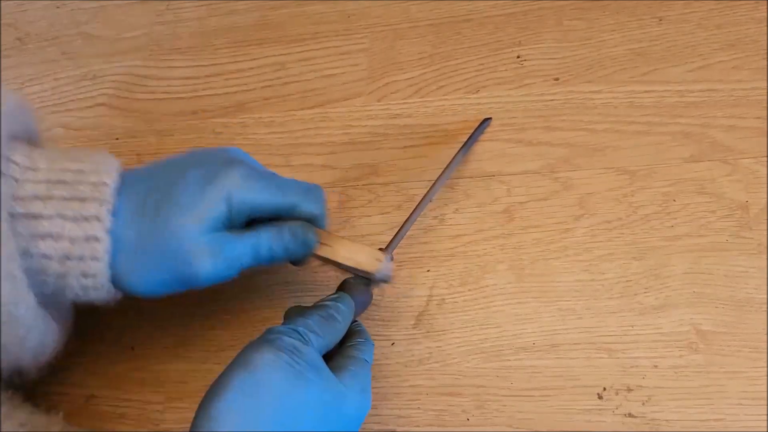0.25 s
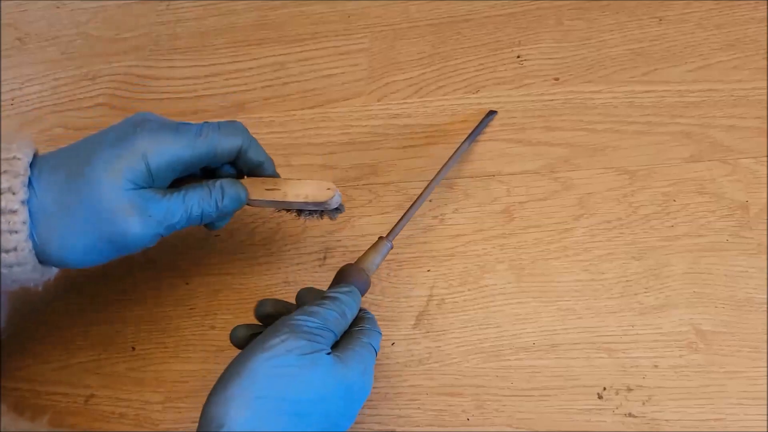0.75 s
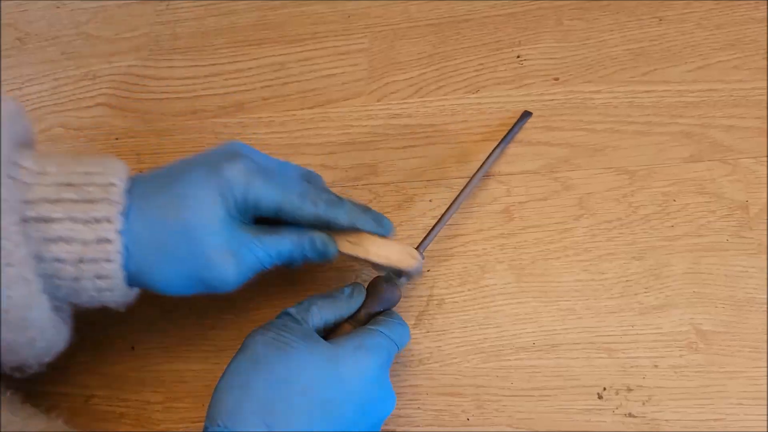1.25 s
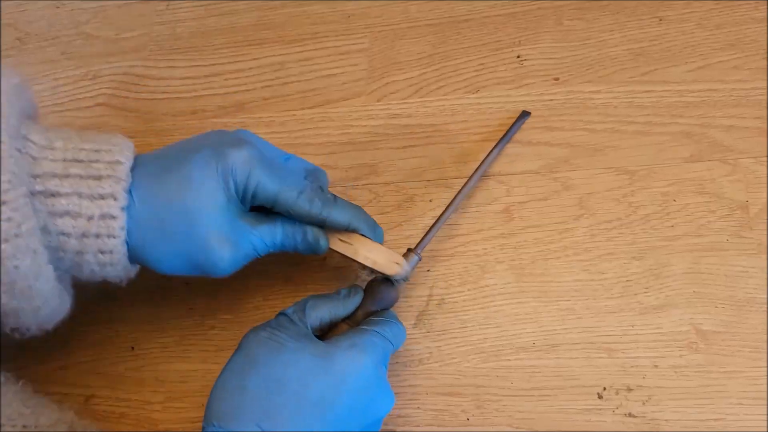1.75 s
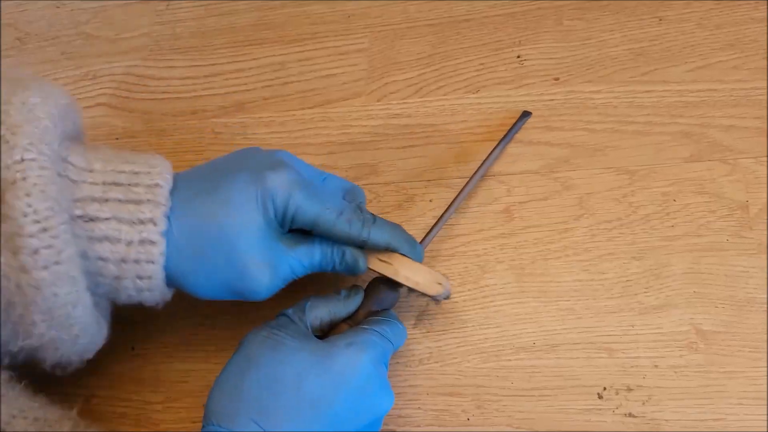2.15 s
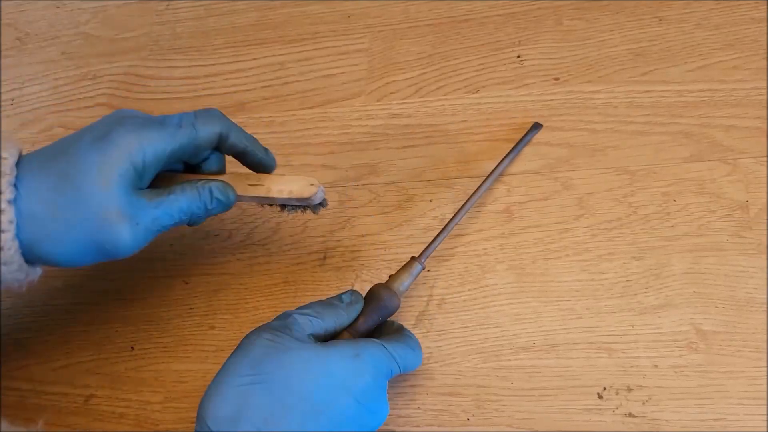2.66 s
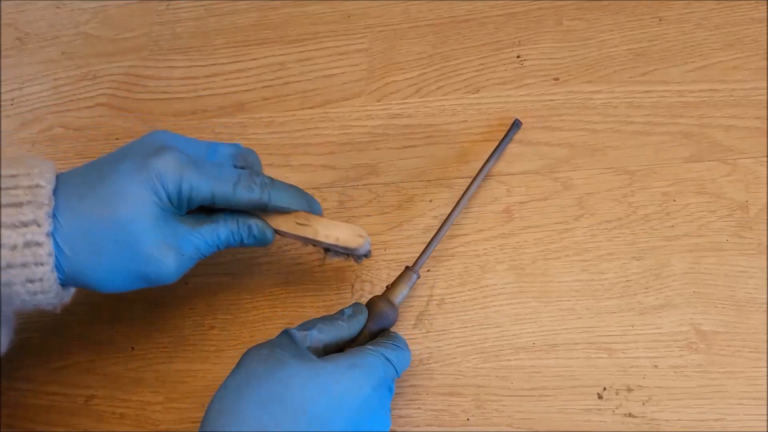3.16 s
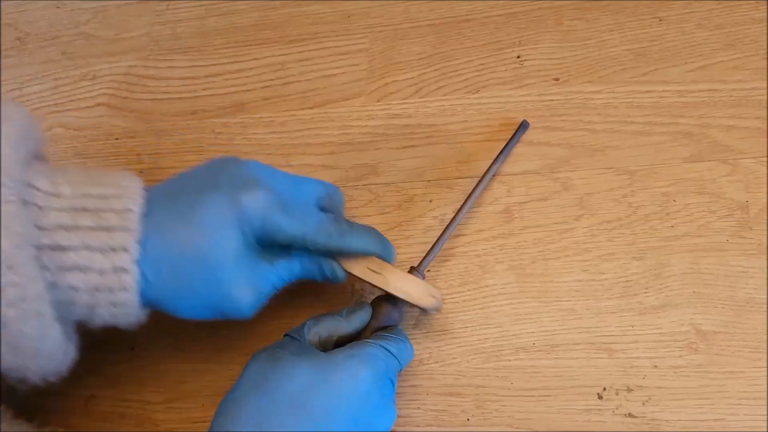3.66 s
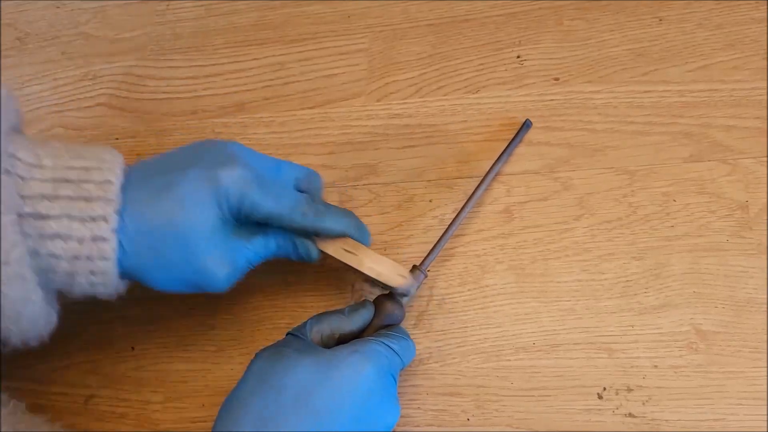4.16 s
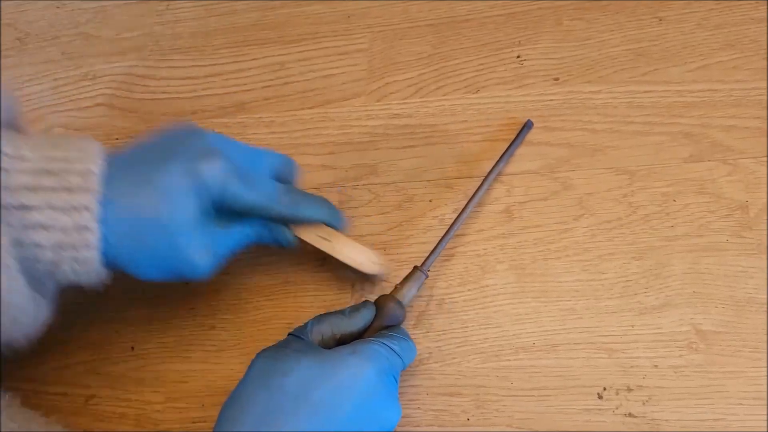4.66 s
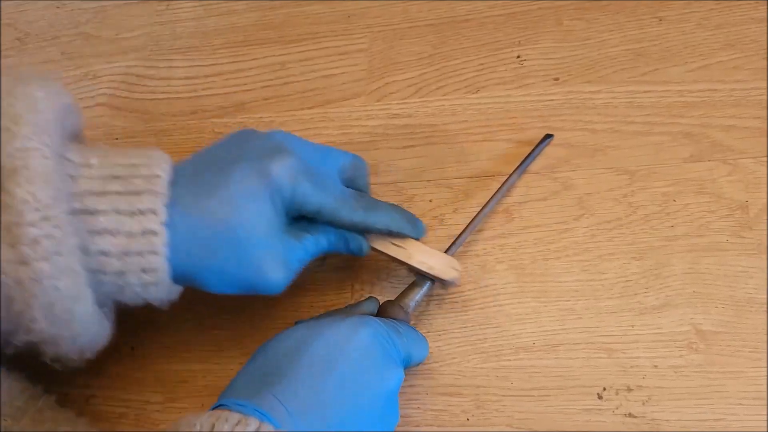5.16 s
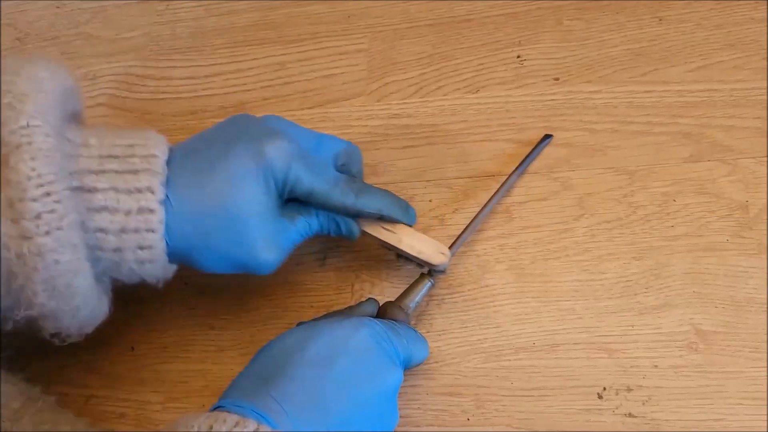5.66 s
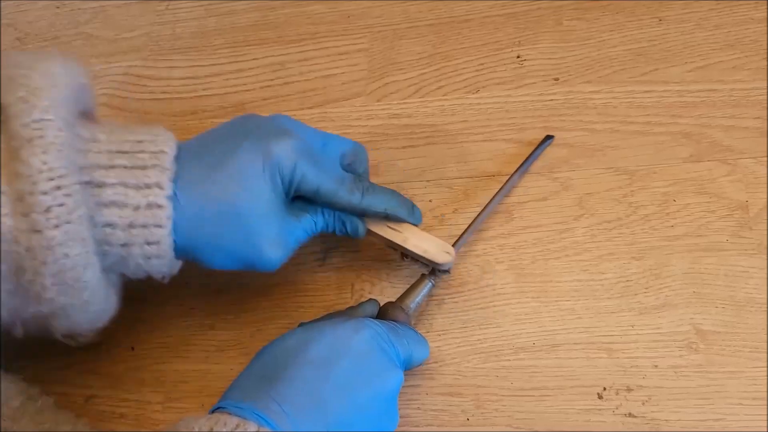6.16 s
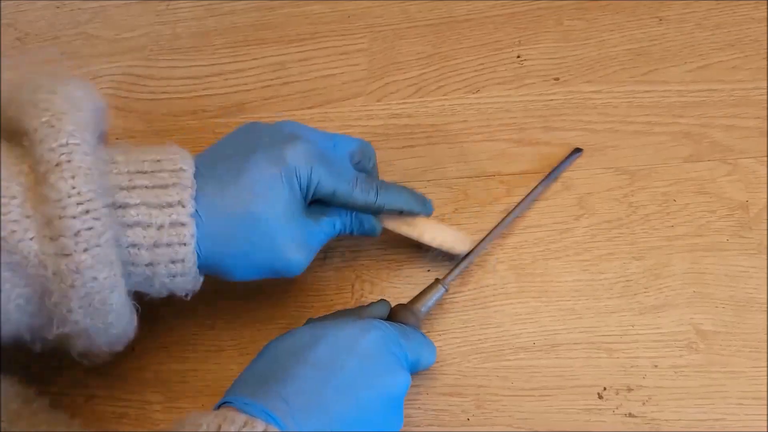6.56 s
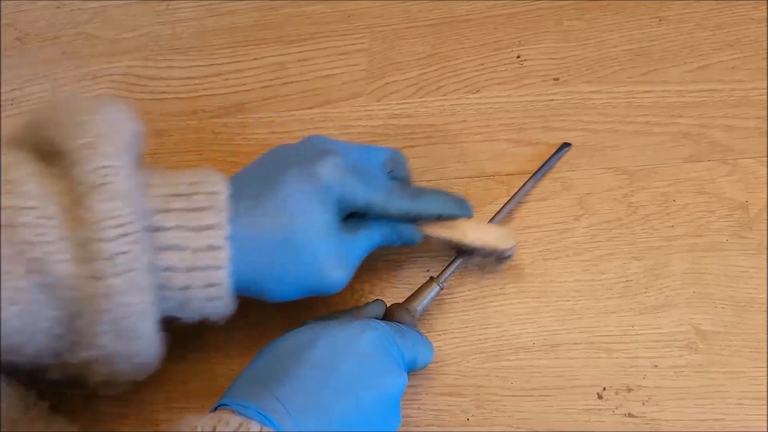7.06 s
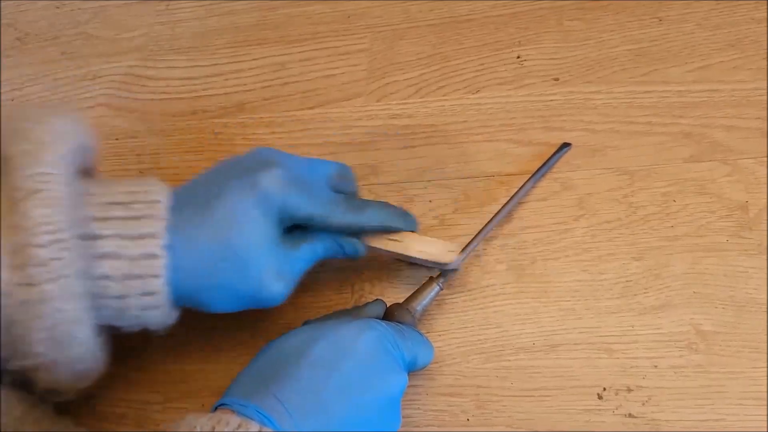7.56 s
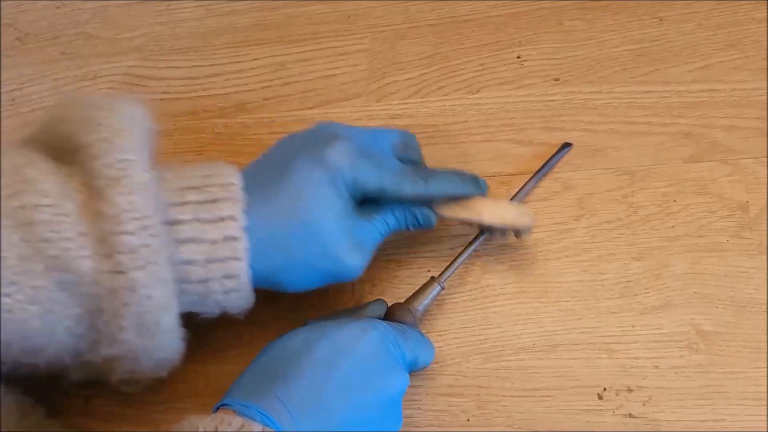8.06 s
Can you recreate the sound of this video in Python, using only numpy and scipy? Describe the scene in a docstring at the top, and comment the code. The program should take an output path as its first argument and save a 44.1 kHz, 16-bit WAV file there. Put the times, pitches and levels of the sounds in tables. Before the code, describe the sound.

A small wire brush scrubs a rusty steel shaft in quick, hissing back-and-forth strokes on a wooden table, with brief pauses and one knock.

```python
"""A small wire brush scrubs a rusty steel shaft held down on a wooden table, close to the microphone.
Each stroke hisses in the bristles, rasps in the shaft and makes the table thrum. Near 0.5 s and again
near 2.5 s the brush lifts and the tool is turned, scraping on the wood as rubber gloves rustle faintly.
Brushing resumes, and the steel rings more as the wires reach the bare shaft. At 6.6 s the tool knocks
once on the table, and the last slow strokes land with soft thuds."""
import sys
import numpy as np
from scipy import signal
from scipy.fft import rfft, irfft, next_fast_len
from scipy.io import wavfile
from scipy.ndimage import uniform_filter1d, map_coordinates

SR = 44100
rng = np.random.default_rng(int(sys.argv[2]) if len(sys.argv) > 2 else 0)


def wrap_up_sound(samples):
    """Save the sound to the file named by the first command line argument, as 16-bit audio."""
    columns = np.atleast_2d(samples).T
    # keep every value between -1 and 1, then stretch to whole-number steps
    tamed = np.clip(columns, -1, 1)
    steps = np.round(tamed * 32767).astype(np.int16)
    wavfile.write(sys.argv[1], SR, steps)


N = 366471
TIME = np.arange(N) / SR

# brush strokes: (bite time [s], length [s], pressure as hiss level [dB], catch on the rust [dB])
STROKES = [(-0.059, 0.073, -54.5, -4.5), (0.094, 0.07, -53, -4.5), (0.238, 0.076, -54, -4),
           (0.378, 0.058, -51.5, -3.5), (1.366, 0.044, -62, -8.5), (1.479, 0.072, -57.0, -6.5),
           (1.633, 0.078, -55.5, -1), (1.78, 0.075, -55.5, 5.5), (1.909, 0.069, -55.5, -2),
           (2.05, 0.074, -51, 0), (2.193, 0.06, -56, 0), (2.324, 0.086, -48.5, -2.5),
           (3.493, 0.059, -64.5, 1), (3.603, 0.058, -57.5, -3.5), (3.74, 0.068, -58, -2.5),
           (3.885, 0.066, -56.5, -3.5), (4.013, 0.075, -55, -3.0), (4.171, 0.058, -55, -2.5),
           (4.301, 0.063, -53.0, 0), (4.443, 0.06, -52.5, -1.5), (4.571, 0.06, -50.5, -2.5),
           (4.709, 0.059, -49, -3.5), (4.921, 0.057, -47, 2), (5.068, 0.061, -61, -7.5),
           (5.202, 0.059, -54, -5), (5.325, 0.066, -58.5, -5), (5.447, 0.069, -56.0, -4),
           (5.604, 0.052, -54.5, -0.5), (5.709, 0.067, -53, -0.5), (5.848, 0.054, -54.5, -3.5),
           (5.958, 0.087, -56, -1), (6.114, 0.063, -56.0, -2), (6.248, 0.063, -52, -2),
           (6.376, 0.073, -58.0, 0), (6.524, 0.08, -57, -4.5), (7.002, 0.081, -58, -2.5),
           (7.145, 0.086, -56.5, 2.5), (7.29, 0.099, -54.0, 1.0), (7.619, 0.097, -52.0, 3),
           (7.947, 0.081, -51, 2), (8.277, 0.039, -49.5, 2.5)]
# spectrum of the wire bristles: (frequency [Hz], relative level [dB])
BRISTLES = [(1200, -27), (2500, -22), (3800, -11.5), (4900, 1.5), (6000, -1.5), (7200, 0.5), (8700, -3.5),
            (10200, -3), (12000, 1.5), (14400, 2.5), (16000, 1)]
# resonances of grit, handle and table: (frequency [Hz], bandwidth [Hz], relative level [dB])
GRIT_MODES = [(3000, 550, -1), (3370, 80, -1), (3760, 400, -6.5), (4190, 100, -0.5), (4560, 360, -22),
              (4680, 160, -4.5), (4970, 1300, -9), (6620, 440, -12), (7660, 1000, -16.5),
              (11900, 9200, -25.5)]
HANDLE_MODES = [(651, 48, -3), (752, 120, -10.5), (852, 87, -1), (923.4, 105, -1), (1051, 95, -0.5),
                (1148, 35, -5.5), (1184, 270, -14.5)]
TABLE_MODES = [(58, 28, -18.5), (139, 26.3, -5), (232.2, 17.6, 2), (268.5, 34.7, 1.5), (322, 84, -7),
               (353.4, 31, -10), (421, 87, -17.5), (507, 74, -23)]


def amp(db):
    """Amplitude ratio: tenfold for every 20 dB."""
    return 10 ** (np.asarray(db) / 20)


def unit_rms(x):
    """Normalisation to unit mean power."""
    return x / np.sqrt(np.mean(x ** 2) + 1e-20)


def read(points, hz):
    """Interpolation on a logarithmic frequency axis."""
    f, value = np.transpose(points)
    return np.interp(np.log(hz + 1), np.log(f + 1), value)


def step(t, edge):
    """Smooth transition from 0 to 1 around t = 0."""
    return .5 + .5 * np.tanh(t / (2 * edge))


def add(mix, s, sound):
    """Superposition: a sound joins the mix at s seconds."""
    part = mix[round(s * SR):][:len(sound)]
    part += sound[:len(part)]


def colour(x, table, size=8192):
    """Minimum-phase filter of unit energy, from a spectrum (two columns) or resonances (three)."""
    hz = abs(np.fft.fftfreq(size, 1 / SR))
    if len(table[0]) == 2:
        gain = amp(read(table, hz))
    else:
        gain = np.sqrt(sum((amp(db) / (1 + (2 * (hz - f) / width) ** 2)) ** 2 for f, width, db in table))
    log_gain = np.log(np.maximum(gain, 1e-5))
    response = np.fft.ifft(np.exp(np.conj(signal.hilbert(log_gain)))).real[:size // 2]
    return signal.oaconvolve(x, response[None] / np.linalg.norm(response), axes=1)[:, :x.shape[1]]


def noise():
    """Partial coherence: white noise at two microphones, alike in the bass, unrelated in the treble."""
    # likeness of left and right: (frequency [Hz], correlation [0-1])
    likeness = [(60, .88), (150, .98), (320, .985), (650, .8), (1100, .7), (2000, .42), (3200, .15),
                (6000, 0), (15000, 0)]
    size = next_fast_len(N)
    left, unrelated = rfft(rng.standard_normal((2, size)))
    same = read(likeness, np.fft.rfftfreq(size, 1 / SR))
    right = same * left + np.sqrt(1 - same ** 2) * unrelated
    return irfft(np.array([left, right]), size)[:, :N]


def snags(per_s, spread_db, decay_s, smooth):
    """Shot noise: the force of many tiny random catches, over a share of smooth sliding."""
    sizes = amp(spread_db * np.minimum(rng.exponential(1, N), 4)) * (rng.random(N) < per_s / SR)
    power = signal.lfilter([1], [1, -np.exp(-1 / (decay_s * SR))], sizes ** 2)
    return np.sqrt(smooth + (1 - smooth) * power / power.mean())


def judder(per_s, depth_db):
    """Random modulation by an uneven grip: a factor that wanders at the given rate."""
    knots = np.arange(0, TIME[-1] + 1, 1 / per_s)
    return unit_rms(amp(depth_db * np.interp(TIME, knots, rng.standard_normal(len(knots)))))


def shimmer(x, patchy_db, bins, sheen_db=0., sheen_hz=10500):
    """Spectral modulation: shifting contacts vary the colour in patches; the finest tips set the sheen."""
    hz, t, spectrum = signal.stft(x, SR, nperseg=512)
    patches = uniform_filter1d(rng.standard_normal(spectrum.shape[1:]), size=bins, axis=0)
    patches = unit_rms(uniform_filter1d(patches, size=12, axis=1))
    top_db = step(hz - sheen_hz, 1200)[:, None] * np.interp(t, TIME, sheen_db * np.ones(N))
    return signal.istft(spectrum * amp(patchy_db * patches + top_db), SR, nperseg=512)[1][:, :N]


def stroke_force(level_db, growth_db, bite_s, release_s, lead_s, turn_db, turn_s, snap_db, snap_s=.007):
    """Friction envelope: wires snap in, sweep and let go, dragging lightly while the hand turns round."""
    power = np.zeros(N)
    for (bite, length, *_), db in zip(STROKES, level_db):
        near = slice(*np.searchsorted(TIME, [bite - .2, bite + length + .3]))
        t = TIME[near] + lead_s - bite
        growth = amp(growth_db * np.clip(t / length - .5, -.5, .5))
        sweep = growth * step(t, bite_s) * step(length - t, release_s)
        turning = amp(turn_db) * step(t + turn_s, 0.016) * step(length + turn_s - t, 0.036)
        snap = amp(snap_db) * step(t + bite_s, 0.00056) * np.exp(-np.maximum(t + bite_s, 0) / snap_s)
        power[near] += amp(db) ** 2 * ((sweep + turning) ** 2 + snap ** 2)
    return np.sqrt(power)


def brush(grit_slope=0.63):
    """Friction noise: pressure sets hiss and thrum; catching on rust adds rasp, grit and chatter."""
    # where the brush works, first by the handle, later on the bare shaft: (time [s], steel ring [dB],
    # share of open wire scratch [0-1], sheen [dB], coupling to handle [dB], coupling to table [dB])
    contact = [(0.2, -36, 0.27, 0.5, 0, 3.5), (1.5, -23, 0.7, -0.5, 0, 6), (2.3, -22, 0.26, -5, -7, 2.5),
               (3.6, -21.5, 0.5, 1, 3, 7.5), (4.6, -22, 0.5, 0, 1, 5), (4.95, -12, 0, -4.5, 0.5, 3),
               (5.801, -6.5, 0, 0, -0.5, 8.5), (6.499, -9, 0.06, 0, -2, 9.5),
               (7.05, -16, 0.25, 1, -10.5, 12), (8.2, -17, 1, -0.5, -5, 3)]
    # resonances of the rubbed shaft: (frequency [Hz], bandwidth [Hz], relative level [dB])
    shaft_modes = [(1516, 160, -9), (1815, 120, -4), (1955, 100, 4.5), (2128, 140, 1), (2380, 300, -5.5),
                   (2700, 450, -8), (3310, 960, -6), (4080, 1500, -6)]
    # spectrum of the open wire scratch: (frequency [Hz], relative level [dB])
    scratch = [(500, -18), (950, -15), (1300, 1.5), (1700, 2.5), (2150, 5.5), (2700, -5), (3400, -7),
               (4200, -7.5), (6500, -14)]
    bite, length, hiss_db, rust_db = np.transpose(STROKES)
    s, *columns, handle_db, table_db = np.transpose(contact)
    ring_db, open_share, sheen_db = (np.interp(TIME, s, column) for column in columns)
    rasp_db = hiss_db + rust_db
    chatter_db = rasp_db + np.interp(bite, s, handle_db)
    thrum_db = hiss_db + np.interp(bite, s, table_db)
    grit_db = grit_slope * np.interp(TIME, bite + length / 2, rust_db)  # hard catches throw off grit

    grip = judder(per_s=130, depth_db=2.35)
    wires = grip * snags(per_s=3500, spread_db=4.0, decay_s=0.00025, smooth=0.54)
    tufts = grip * snags(per_s=960, spread_db=-0.5, decay_s=0.00057, smooth=0.4)
    flicking = wires * stroke_force(hiss_db, growth_db=-3.5, bite_s=0.011, release_s=0.0073,
                                    lead_s=0., turn_db=-11.5, turn_s=0.016, snap_db=-15)
    rubbing = wires * stroke_force(rasp_db, growth_db=2, bite_s=0.0093, release_s=0.01,
                                   lead_s=.0005, turn_db=-29.5, turn_s=0.061, snap_db=-23)
    shaking = tufts * stroke_force(chatter_db, growth_db=1.5, bite_s=0.0085, release_s=0.0068,
                                   lead_s=0.0022, turn_db=-16, turn_s=0.03, snap_db=-9)
    pressing = stroke_force(thrum_db, growth_db=5.5, bite_s=0.0091, release_s=0.0089,
                            lead_s=0.0076, turn_db=-21.5, turn_s=0.045, snap_db=-1)

    hiss = shimmer(colour(noise() * flicking, BRISTLES), patchy_db=1.03, bins=9, sheen_db=sheen_db)
    rasp = colour(noise() * rubbing * np.sqrt(1 - open_share), shaft_modes)
    rasp += colour(noise() * rubbing * np.sqrt(open_share), scratch)
    ring = steel(noise() * rubbing * amp(ring_db))
    grit = colour(noise() * rubbing * tufts * amp(grit_db), GRIT_MODES)
    chatter = colour(noise() * shaking, HANDLE_MODES)
    thrum = colour(noise() * pressing, TABLE_MODES)
    body = amp(-1.98) * rasp + ring + amp(-10) * grit + amp(-1.9) * chatter + amp(-0.57) * thrum
    return amp(0.62) * hiss + amp(-0.46) * shimmer(body, patchy_db=2.0, bins=4)


def steel(force):
    """Modal vibration: the shaft rings as a sum of decaying sinusoids, damped by the hand."""
    # modes of the steel: (frequency [Hz], relative level [dB], time to fall 60 dB [s])
    modes = [(1952, -2, .16), (2072, -7, .13), (2133, -5, .15), (2856, -12, .12), (3230, -7, .18),
             (3316, -1, .23), (3385, -2, .22), (3490, -6, .18), (4000, -11, .18)]
    t = np.arange(SR // 2) / SR
    ring = sum(amp(db - 60 * t / t60) * np.sin(2 * np.pi * hz * t) for hz, db, t60 in modes)
    return signal.oaconvolve(force, ring[None] / np.linalg.norm(ring), axes=1)[:, :N]


def thuds(swish_s=0.046, tick_s=0.0062, settle_s=0.02124, settle_db=-14.5, settle_slower=2.8):
    """Impact: the longer the contact, the deeper the table thuds. Jolted wires swish, the handle ticks."""
    # soft thuds of the table under the brush, the hand and the dragged tool:
    # (time [s], peak level [dB], period of push and rebound [s])
    table_thuds = [(0.439, -45, 0.0049), (0.561, -59, 0.0033), (1.04, -42.5, 0.0052), (1.086, -42, 0.0067),
                   (1.123, -40, .014), (1.173, -43, 0.0064), (1.255, -48.5, .017), (2.373, -35.5, 0.003),
                   (2.439, -47.5, .017), (2.695, -55.5, 0.004), (2.802, -53, 0.0065), (3.254, -71, 0.011),
                   (3.461, -51.5, 0.005), (4.293, -39.5, .003), (4.567, -37, 0.0033), (4.748, -37, 0.0066),
                   (5.338, -40, 0.00084), (6.643, -30, 0.0055), (6.663, -32, .007), (6.916, -50, 0.0015),
                   (7.317, -39.5, 0.0043), (7.572, -30.5, 0.0067), (7.882, -44.5, 0.007),
                   (8.029, -33, 0.0038), (8.226, -31, 0.0071)]
    t = np.arange(SR // 2) / SR
    wood, swish, tick = np.zeros((3, N))
    for s, db, contact in table_thuds:
        settling = (s + settle_s, db + settle_db, contact * settle_slower)  # the hand's weight follows
        for start, peak_db, period in (s, db, contact), settling:
            push = np.sin(2 * np.pi * np.minimum(t / period, 1))
            thud = colour(push[None], TABLE_MODES)[0]
            add(wood, start, amp(peak_db) * thud / abs(thud).max())
        jolt = 1 / (1 + (contact / 0.0054) ** 3)  # a slow push hardly shakes the wires
        add(swish, s, jolt * amp(0.41 * db - 43) * np.exp(-t / swish_s))
        add(tick, s, jolt * amp(db - 21) * np.exp(-t / tick_s))
    return wood + colour(noise() * swish, BRISTLES) + colour(noise() * tick, HANDLE_MODES)


def drags(firm_db=-52, rise_s=0.019, fall_s=0.011, pitch_per_speed=.03, bright_hz=1240):
    """Stick-slip friction of the tool on wood grain: faster is brighter, grittier and slightly higher."""
    # short pushes that turn the tool: (start time [s], length [s], speed as scrape level [dB])
    pushes = [(0.464, 0.07, -65.5), (0.558, 0.08, -66), (0.884, 0.039, -55.5), (0.919, 0.035, -47),
              (1, 0.095, -45.5), (1.133, 0.0728, -47.5), (2.431, 0.033, -51.5), (2.569, 0.06, -51.5),
              (2.636, 0.14, -68), (2.847, 0.037, -69), (2.907, 0.087, -48.5), (3.085, 0.056, -83),
              (3.176, 0.018, -68.5), (3.243, .035, -72.5)]
    # drift of the scrape's pitch as the tool turns: (time [s], pitch [ratio])
    drift = [(0.5, 1.005), (0.95, 0.98), (1.08, 1.01), (1.17, 1.02), (2.5, 1.03), (2.9, 0.97), (3.3, 1.05)]
    # resonances of the scrape: (frequency [Hz], bandwidth [Hz], relative level [dB])
    scrape_modes = [(638, 32, 1.5), (720, 61, -7.5), (843, 140, -1.5), (1070, 102, -8), (1538, 92, -2),
                    (1764, 220, -4.5), (1960, 150, -8.5), (2130, 95, -8), (2390, 140, -14)]
    speed = sum(amp(db - firm_db) * step(TIME - s, rise_s) * step(s + length - TIME, fall_s)
                for s, length, db in pushes)  # 1 is a firm push
    slips = judder(per_s=58, depth_db=3.6) * snags(per_s=900, spread_db=4.5, decay_s=0.00029, smooth=0.7)
    pitch = np.interp(TIME, *np.transpose(drift)) + pitch_per_speed * (speed - 1)
    travel = np.cumsum(pitch * judder(per_s=25, depth_db=0.1))  # pitch wanders as the contact shifts
    steady_rub = colour(noise() * slips, scrape_modes)
    rub = np.array([map_coordinates(side, [travel], order=3) for side in steady_rub])
    # a slow push rings mainly the low, hollow modes
    hollow = signal.sosfiltfilt(signal.butter(3, bright_hz, fs=SR, output="sos"), rub)
    scrape = shimmer(hollow + (rub - hollow) * speed ** 0.46, patchy_db=1.5, bins=3) * speed
    grit = colour(noise() * slips * speed ** 1.84, GRIT_MODES)
    thrum = colour(noise() * speed ** 0.67, TABLE_MODES)
    return amp(firm_db) * (amp(0.9) * scrape + amp(-9.5) * grit + amp(-6.5) * thrum)


def gloves(edge_s=0.025):
    """Sliding friction: rubber rustles faintly while the grip is changed."""
    # rustles: (start time [s], length [s], level [dB])
    rustles = [(0.56, 0.55, -77), (2.55, 0.17, -82)]
    level = sum(amp(db) * step(TIME - s, edge_s) * step(s + length - TIME, edge_s)
                for s, length, db in rustles)
    force = noise() * level * snags(per_s=150, spread_db=11.5, decay_s=.001, smooth=0.8)
    return colour(force, BRISTLES)


def knocks(rise_s=0.0065, decay_s=.013, click_s=0.00025, clatter_s=0.024, ring_db=-16):
    """Hard impacts excite a wide band: short rattles and one click with a clatter. The steel rings on."""
    # the tool, dragged or caught by the wires, bounces on the table: (time [s], level [dB])
    bounces = [(0.987, -48.5), (1.162, -65), (1.427, -57), (1.66, -44), (1.82, -42), (2.067, -45.5),
               (2.215, -42.5), (2.39, -38.5), (2.898, -57), (4.935, -38), (5.729, -51), (5.886, -43.5),
               (6.259, -43.5), (6.398, -42.5), (6.714, -37)]
    # the tool hits the table: (time [s], click level [dB], clatter level [dB])
    knock = (6.6444, -25.5, -35.5)
    # spectrum of the tool striking wood: (frequency [Hz], relative level [dB])
    clack = [(200, -11), (560, -13.5), (900, 0.5), (1100, -1.5), (1400, -20), (1980, 2), (2650, -14),
             (3300, -6.5), (3900, -15), (5000, -16), (7400, -20.5), (9000, -28.5), (16000, -29)]
    hit, click_db, clatter_db = knock
    age = np.maximum(TIME - hit, 0)
    click = amp(click_db) * (age > 0) * np.exp(-age / click_s)
    rattle = amp(clatter_db) * (age > 0) * np.exp(-age / clatter_s)
    for s, db in bounces:
        age = np.maximum(TIME - s, 0)
        rattle += amp(db) * np.minimum(age / rise_s, 1) * np.exp(-np.maximum(age - rise_s, 0) / decay_s)
    force = noise() * (click + rattle * snags(per_s=1900, spread_db=10.0, decay_s=0.00051, smooth=0.51))
    return colour(force, clack) + amp(ring_db) * steel(force)


def room(x, delay_s=0.00632):
    """Reverberation of a small room: a diffuse tail, weak in the bass, each band at its own decay rate."""
    # reverberation times: (frequency [Hz], time to fall 60 dB [s])
    decay_times = [(100, 0.65), (500, 0.17), (2000, 0.23), (6000, 0.34), (15000, 0.12)]
    t = np.arange(SR // 2) / SR
    hz, age, spectrum = signal.stft(noise()[:, :len(t)] * (t > delay_s), SR, nperseg=256)
    spectrum *= amp(-60 * age / read(decay_times, hz)[:, None]) * (hz / (hz + 300))[:, None]
    tail = signal.istft(spectrum, SR, nperseg=256)[1]
    return signal.fftconvolve(x, tail / np.linalg.norm(tail[0]), axes=1)[:, :N]


def scene():
    """Superposition of the direct sound, its reverberation and the room's faint background noise."""
    # spectrum of the quiet room: (frequency [Hz], relative level [dB])
    background = [(18, -37), (45, 8), (130, -5), (200, -5.5), (260, -3), (350, -16.5), (500, -20),
                  (1000, -26.5), (3000, -26.5), (6000, -28), (15000, -24.5)]
    direct = brush() + drags() + gloves() + thuds() + knocks()
    return direct + amp(-7.5) * room(direct) + amp(-77.5) * colour(noise(), background)


def record(dry, low_cut_hz=36, high_cut_hz=15900):
    """Frequency response: each microphone has its own colour and a limited band. The level dips once."""
    # balance of the microphones: (frequency [Hz], left minus right [dB])
    balance = [(60, -3), (200, -0.2), (380, 3), (700, -4), (1300, 1), (4400, 1), (8100, -0.7), (15000, 4.5)]
    # brief dip in level: (time [s], gain [dB]); the end values hold before and after it
    dip = [(4.832, 2), (4.843, -18), (4.86, -23), (4.869, 1.5)]
    size = next_fast_len(N)
    lean_db = read(balance, np.fft.rfftfreq(size, 1 / SR)) / 2
    heard = irfft(rfft(dry, size) * amp([lean_db, -lean_db]), size)[:, :N]
    heard = signal.sosfilt(signal.butter(3, low_cut_hz, "high", fs=SR, output="sos"), heard)
    heard *= amp(np.interp(TIME, *np.transpose(dip)))
    low_pass = signal.firwin(511, high_cut_hz, window=("kaiser", 9), fs=SR)
    return signal.oaconvolve(heard, low_pass[None], "same")


dry = scene()
out = record(dry)
wrap_up_sound(out)
```